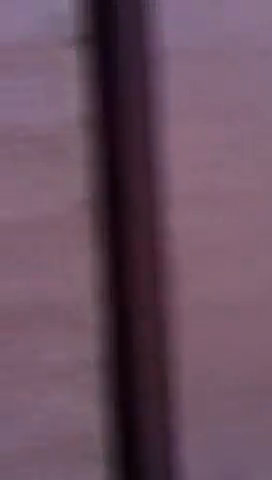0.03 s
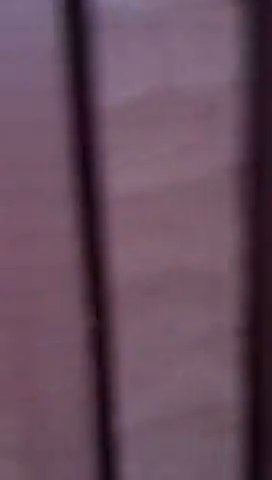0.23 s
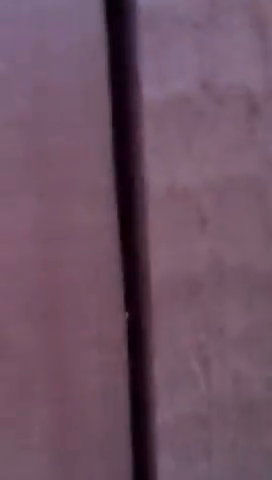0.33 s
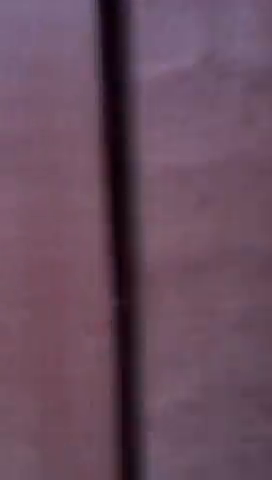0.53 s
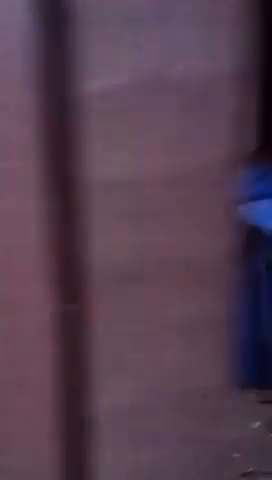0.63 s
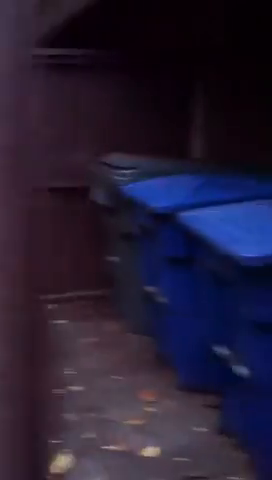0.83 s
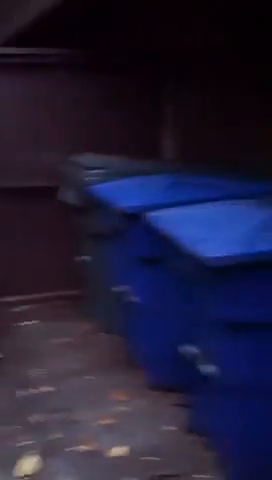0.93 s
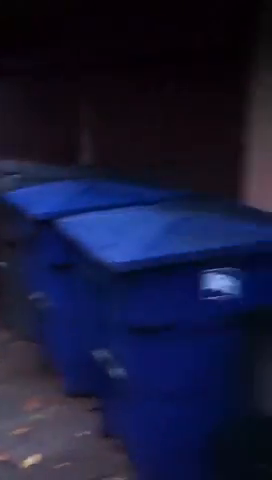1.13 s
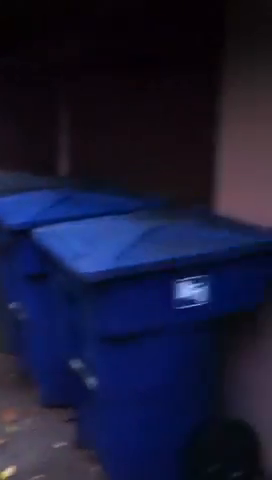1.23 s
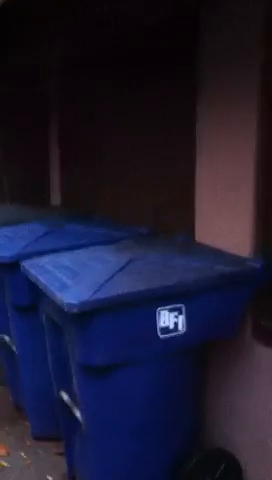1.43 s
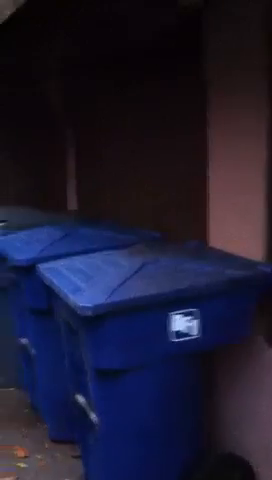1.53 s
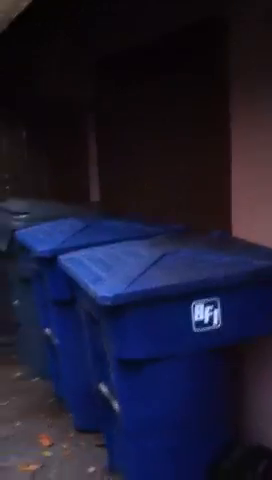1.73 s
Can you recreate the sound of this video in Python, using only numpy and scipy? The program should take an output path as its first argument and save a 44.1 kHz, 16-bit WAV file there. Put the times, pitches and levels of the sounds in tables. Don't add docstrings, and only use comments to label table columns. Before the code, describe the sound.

A gate's metal slide bolt is drawn close by: after near quiet, a gritty scrape with a piercing squeal bursts at 0.2-0.3 s and ends in a woody thud. Short creaks follow, strongest near 0.57 s, with faint ticks. It stays quiet until about 1.4 s, when leaves crackle; a latch plate knocks the post and rebounds at 1.5 s. Low traffic wash, faint hum and short yard echo remain behind.

```python
import sys
import numpy as np
from scipy import signal
from scipy.fft import rfft, irfft
from scipy.io import wavfile
from scipy.ndimage import uniform_filter1d

SR = 44100
rng = np.random.default_rng(int(sys.argv[2]) if len(sys.argv) > 2 else 0)


def gain_from_db(level_db):
    decades = np.asarray(level_db, float) / 20
    return 10 ** decades


def master_out(mix):
    frames = np.transpose(np.atleast_2d(mix))
    ceiling = np.clip(frames, -1, 1)
    pcm = np.round(ceiling * 32767).astype(np.int16)
    wavfile.write(sys.argv[1], SR, pcm)


N = 79380

# time_s, squeal_db (steel), scrape_db, wood_db (pressure on the boards)
BOLT_DRAW = [
    (0.142, -82, -73, -66.5),
    (0.176, -74, -62.5, -41.5),
    (0.199, -43.5, -47.5, -34),
    (0.227, -36, -34.5, -33.5),
    (0.2365, -15, -28, -36),
    (.27, -24.5, -23, -25),
    (0.298, -44, -24, -22.5),
    (0.306, -71, -60, -33.5),
    (0.341, -93, -64, -46),
]
# pitch_hz, width_hz, level_db
BOLT_MODES = [(7060, 200, -13), (8120, 270, -18.5), (9760, 120, -17.5), (10180, 100, -13.5),
              (10740, 170, -13.5), (11930, 100, -24), (14600, 120, -23.5)]
# freq_hz, level_db (per Hz)
SCRAPE_SPECTRUM = [(120, -31.5), (900, -18.5), (2200, -12.5), (5500, -21.5), (8000, -15.5), (11000, -26),
                   (13200, -28), (14000, -56.5)]
# pitch_hz, width_hz, level_db
STAPLE_MODES = [(1245.6, 44, -7), (1764, 35, -6), (2310, 120, -8), (2818, 110, -6), (3884, 92, -15.5),
                (4407, 100, -7.5), (4657, 110, -6.5), (5270, 120, -17.5), (6070, 130, -11),
                (6700, 150.7, -15)]
# pitch_hz, width_hz, level_db
BOARD_MODES = [(401.7, 150, -18), (583.7, 88, -5.5), (875, 130, -7), (1000, 140, -5.5), (1211, 200, -3),
               (1896, 180, -8), (2097, 100.3, -13.5), (2404, 210, -11.5), (3004, 99, -15), (4180, 300, -14),
               (4740, 150, -18)]
# pitch_hz, level_db, t60_s
BOLT_RING_MODES = [(7400, -46.5, 0.45), (10400, -56, .4)]
# peak_s, level_db, pitch_hz, rise_s, t60_s
GATE_CREAKS = [(.18, -33.5, 866, .024, 0.059), (.286, -12, 786.4, 0.01, 0.061),
               (.302, -13, 564, 0.013, 0.059), (.4, -44, 772, .015, 0.086),
               (.571, -20.5, 535.3, .011, 0.052), (.605, -41, 499, 0.00643, 0.092),
               (.699, -33, 554.7, 0.019, 0.078), (.724, -33, 577, .006, 0.046),
               (.745, -46.5, 550, .008, 0.081), (.85, -41, 599, 0.0098, 0.07),
               (.866, -43.5, 615, .006, 0.094), (1.116, -47.5, 582.6, 0.02, 0.2),
               (1.35, -54.5, 631, 0.0086, 0.14), (1.434, -40, 690, 0.0099, 0.088),
               (1.51, -34, 887, 0.024, 0.055), (1.697, -45, 694, 0.016, 0.034),
               (1.793, -34.5, 649, 0.013, .15), (1.795, -39, 787, 0.016, 0.061)]
# multiple, level_db
CREAK_OVERTONES = [(2.04, -7), (2.75, -17.5), (3.7, -30.5)]
# pitch_hz, level_db, t60_s
PLATE_MODES = [(4210, -15, .17), (5006, -20, .9), (5313, -18, .25), (5700, -3, .05), (5846, -14, .5),
               (6342, 0, .26), (6621, -1, .2), (7127, -6, .09), (8979, -27, .6), (10050, -6.5, .2),
               (11800, -23, .33), (12270, -16, .1), (13360, -12, .17), (14740, -8, .13)]
# pitch_hz, level_db, t60_s
POST_MODES = [(244.5, -15.5, 0.19), (332.4, -13, 0.15), (597.5, -0.5, 0.097), (689, 0.5, 0.06),
              (1070, -14, 0.034), (1270, -15, 0.064), (1805, -8.5, 0.064), (3053, -14, 0.038)]
# freq_hz, level_db (per Hz)
CRACK_SPECTRUM = [(120, -21), (350, 2), (1500, 2), (3300, -6), (10500, -19), (12000, -48)]
# delay_s (after the knock), level_db
KNOCK_REBOUNDS = [(.0055, -2), (.012, -4.5), (.026, -7)]
# peak_s, level_db, pitch_hz, rise_s, t60_s
SINGLE_PINGS = [(.018, -62, 6630, .014, .07), (.195, -35, 7140, .002, .04), (.244, -20, 2875, .009, .13),
                (.262, -21, 1765, .008, .05), (.27, -21, 2890, .015, .03), (.31, -40, 55, .02, .08),
                (.195, -46, 45, .02, .08), (.298, -33, 238, .02, .1), (.39, -52, 160, .03, .2),
                (.570, -36, 5300, .003, .02), (.575, -33, 942, .006, .09), (.572, -31, 1380, .005, .04),
                (.572, -40, 410, .008, .07), (.572, -40, 2060, .004, .04), (.574, -43, 1900, .005, .07),
                (.572, -40, 4120, .003, .025), (.51, -50, 1300, .008, .05), (.573, -29, 1485, .003, .04),
                (.574, -36, 5750, .002, .02), (1.192, -52, 3700, .003, .06), (1.283, -59, 2590, .008, .26),
                (.222, -33, 2300, .005, .03), (.235, -30, 2250, .006, .03), (.203, -35, 1200, .005, .04),
                (.283, -24, 2750, .003, .04), (.287, -24, 2000, .006, .06), (.293, -21, 1000, .008, .06),
                (1.409, -50, 4200, .002, .04), (1.455, -52, 3050, .004, .1), (1.424, -47, 480, .005, .04),
                (.7, -47, 950, .012, .12), (.36, -50, 380, .02, .2)]
# start_s, level_db, centre_hz, t60_s
LATCH_TICKS = [(0.445, -52, 3610, 0.023), (0.499, -51.5, 4640, 0.046), (.518, -53, 3040, 0.037),
               (.53, -49.5, 4250, 0.065), (.593, -47, 4470, 0.012), (.598, -53, 4500, 0.028),
               (0.611, -45.5, 4950, 0.034), (.633, -56.5, 4800, .03), (.821, -54.5, 2480, .03),
               (.93, -62, 4680, 0.021), (1.028, -63.5, 4500, 0.017), (1.348, -55, 894, 0.018),
               (1.406, -51.5, 2920, 0.059), (1.429, -49, 3200, 0.046), (.568, -42.5, 7940, 0.027)]
# start_s, level_db (rms), rise_s, t60_s, tilt_db (per octave)
LEAF_RUSTLES = [(.03, -54.5, 0.023, 0.53, -5), (0.192, -30.5, 0.0019, 0.09, 2.5), (.42, -51.5, 0.016, 1, 2),
                (.566, -32, 0.0092, 0.05, 2), (.612, -54, 0.0028, 0.13, 4.5),
                (0.664, -51.5, 0.0062, 0.29, 2.5), (.82, -52.5, 0.0028, 0.27, -4),
                (0.88, -67, .001, 0.048, 3), (1.101, -55, 0.0087, 0.08, -3.5),
                (1.186, -53, 0.0014, 0.24, 3), (1.25, -56, 0.017, 0.18, 1.5),
                (1.405, -48.5, 0.0043, 0.33, 3.5), (1.422, -42, 0.0031, 0.51, -0.5),
                (1.491, -42.5, 0.026, 0.28, -0.5), (1.529, -38.5, 0.0026, 0.21, -0.5),
                (1.674, -50.5, 0.0014, 0.19, 0.5), (1.715, -56.5, 0.012, 0.86, 2.5),
                (1.785, -42, 0.0039, 0.24, -2.5)]
# freq_hz, level_db (per Hz)
LEAF_SPECTRUM = [(70, -39), (170, -10), (708, -3.5), (1240, -10), (2400, -16), (10500, -32), (13000, -37.5),
                 (15400, -39.5)]
# freq_hz, t60_s
YARD_DECAY = [(200, .25), (1000, 0.57), (4000, 0.55), (12000, 0.5)]
# freq_hz, level_db (per Hz)
WASH_SPECTRUM = [(15, -84), (25, -27.5), (219, -8.5), (309, -14.5), (427, -14.5), (462, -16.5), (515, -20),
                 (3090, -34), (15000, -50.5)]
# time_s, level_db
HUM_LEVEL = [
    (0, -64),
    (.9, -66.5),
    (1.15, -60),
    (1.8, -57.5),
]
# freq_hz, level_db
MIC_RESPONSE = [(30, -23.5), (70, -7), (130, 2), (11000, -0.5), (13000, -11.5), (15500, -16)]

BOLT_STOP_S, KNOCK_S = 0.3, 1.518
SQUEAL_HZ, SQUEAL_WAVER = 7150, 0.12
OVERTONE_SLOPE = 0.43
KNOCK_DB, CRACK_DB, PLATE_DB = -26.5, -23.5, -42
WOOD_PER_S, WOOD_SPREAD_DB = 3000, 2.5
CRACKLE_PER_S, CRACKLE_SPREAD_DB = 14000, 2
PATCH_DB = 3.5
TICK_OCTAVES, TICK_SKIRT_DB = 0.36, -16.5
YARD_DB, SQUEAL_SEND_DB = -22, -7.5
WASH_DB, HUM_HZ = -58, 305.8


def bolt():
    s, *levels = np.transpose(BOLT_DRAW)
    t = np.arange(N) / SR
    squeal, scrape, wood = (gain_from_db(np.interp(t, s, db, -120, -120)) for db in levels)

    steel_grit = patchy(colour(grit(N, per_s=16000, spread_db=1.5), SCRAPE_SPECTRUM))
    staples = gain_from_db(-4.5) * body(STAPLE_MODES, WOOD_PER_S, WOOD_SPREAD_DB)
    boards = body(BOARD_MODES, WOOD_PER_S, WOOD_SPREAD_DB)
    rubbing = scrape * (steel_grit + staples) + wood * boards
    add(rubbing, BOLT_STOP_S, ring(BOLT_RING_MODES, waver=0.3))

    cycles = SQUEAL_HZ * np.cumsum(1 + 0.003 * drift(N, size=300)) / SR
    song = np.sqrt(2) * (1 + SQUEAL_WAVER * drift(N, size=150)) * np.sin(2 * np.pi * cycles)
    rough = body(BOLT_MODES, per_s=3000, spread_db=3.1)
    return squeal * (gain_from_db(-9) * rough + gain_from_db(-0.5) * song), rubbing


def creaks():
    out = np.zeros(N)
    for s, db, hz, rise, t60 in GATE_CREAKS:
        t, env = swell(rise, t60)
        wobble = 0.015 * drift(len(t), size=200)
        phase = 2 * np.pi * hz * np.cumsum(1 + wobble) / SR
        weaker_db = OVERTONE_SLOPE * min(db + 22.5, 0)
        overtones = sum(gain_from_db(o_db + weaker_db) * np.sin(k * phase) for k, o_db in CREAK_OVERTONES)
        add(out, s - rise, gain_from_db(db) * env * (np.sin(phase) + env ** 0.48 * overtones))
    return out


def knock():
    out = np.zeros(N)
    t, env = swell(rise=0.00074, t60=0.039)
    add(out, KNOCK_S + 0.004, gain_from_db(PLATE_DB) * ring(PLATE_MODES, waver=0.28))
    for delay, db in [(0, -0.56)] + KNOCK_REBOUNDS:
        add(out, KNOCK_S + delay, gain_from_db(KNOCK_DB + db) * ring(POST_MODES))
        crack = env * colour(grit(len(t), CRACKLE_PER_S, CRACKLE_SPREAD_DB), CRACK_SPECTRUM)
        add(out, KNOCK_S + delay, gain_from_db(CRACK_DB + 3.7 * db) * crack)
    return out


def pings():
    out = np.zeros(N)
    for s, db, hz, rise, t60 in SINGLE_PINGS:
        t, env = swell(rise, t60)
        add(out, s - rise, gain_from_db(db) * env * np.sin(2 * np.pi * hz * t))
    return out


def ticks():
    out = np.zeros(N)
    for s, db, hz, t60 in LATCH_TICKS:
        t, env = swell(0.00088, t60)
        band = [(hz / 8, 3 * TICK_SKIRT_DB),
                (hz / 2 ** TICK_OCTAVES, TICK_SKIRT_DB / 3),
                (hz, 0),
                (hz * 2 ** TICK_OCTAVES, TICK_SKIRT_DB / 2),
                (hz * 4, 2 * TICK_SKIRT_DB)]
        add(out, s, gain_from_db(db) * env * colour(grit(len(t), CRACKLE_PER_S, CRACKLE_SPREAD_DB), band))
    return out


def rustles():
    out = np.zeros(N)
    for s, db, rise, t60, tilt_db in LEAF_RUSTLES:
        t, env = swell(rise, t60)
        crackle = colour(grit(len(t), CRACKLE_PER_S, CRACKLE_SPREAD_DB), LEAF_SPECTRUM, tilt_db)
        add(out, s, gain_from_db(db) * env * patchy(crackle))
    return out


def yard(x):
    taps = np.zeros(SR // 2)
    at = np.arange(300, SR // 2 - 20, 20)
    taps[at + rng.integers(0, 20, len(at))] = rng.choice([-1., 1.], len(at))
    hz, t, z = signal.stft(taps, SR, nperseg=256)
    decay = gain_from_db(-60 * t / read(YARD_DECAY, hz)[:, None])
    tail = signal.istft(z * decay, SR, nperseg=256)[1]
    return signal.fftconvolve(x, tail / np.linalg.norm(tail))[:N]


def wash():
    frames, hz = N // 256 + 5, np.fft.rfftfreq(1024, 1 / SR)
    a, b, patches = rng.standard_normal((frames, 513, 3)).T
    patches = uniform_filter1d(uniform_filter1d(patches, size=12, axis=0), size=12, axis=1)
    z = (a + 1j * b) * gain_from_db(read(WASH_SPECTRUM, hz)[:, None] + 1.3 * evened(patches))
    air = evened(signal.istft(z, nperseg=1024, noverlap=768)[1][:N])

    s, db = np.transpose(HUM_LEVEL)
    t = np.arange(N) / SR
    steady = np.sqrt(2) * np.sin(2 * np.pi * HUM_HZ * t)
    wavering = 0.24 * evened(resonate(rng.standard_normal(N), HUM_HZ, 5.4))
    return gain_from_db(WASH_DB) * air + gain_from_db(np.interp(t, s, db)) * (steady + wavering)


def grit(count, per_s, spread_db):
    size = gain_from_db(spread_db * np.minimum(rng.exponential(1, count), 5)) * rng.standard_normal(count)
    return evened(size * (rng.random(count) < per_s / SR))


def body(modes, per_s, spread_db):
    out = 0
    for hz, width, db in modes:
        once = resonate(grit(N, per_s, spread_db), hz, width)
        out = out + gain_from_db(db) * evened(resonate(once, hz, width))
    return evened(out)


def ring(modes, waver=0):
    t = np.arange(16000) / SR
    out = np.zeros(len(t))
    for hz, db, t60 in modes:
        strength = gain_from_db(db - 60 * t / t60) * (1 + waver * drift(len(t), size=400))
        out += strength * np.sin(2 * np.pi * (hz * t + rng.random()))
    return np.minimum(t / 0.00099, 1) * out


def swell(rise, t60):
    t = np.arange(12000) / SR
    attack = np.sin(np.pi / 2 * np.clip(t / max(rise, 1e-4), 0, 1)) ** 2
    return t, attack * gain_from_db(-60 * np.maximum(t - rise, 0) / t60)


def patchy(x):
    z = signal.stft(x, nperseg=256, noverlap=192)[2]
    patches = uniform_filter1d(rng.standard_normal(z.shape), size=3, axis=0)
    patches = evened(uniform_filter1d(patches, size=6, axis=1))
    return evened(signal.istft(z * gain_from_db(PATCH_DB * patches), nperseg=256, noverlap=192)[1][:len(x)])


def resonate(x, hz, width):
    turn = np.exp(2j * np.pi * hz * np.arange(len(x)) / SR)
    r = np.exp(-np.pi * abs(width) / SR)
    return 2 * (turn * signal.lfilter([1 - r], [1, -r], x / turn)).real


def colour(x, points, tilt_db=0):
    hz = np.fft.rfftfreq(len(x), 1 / SR)
    gain_db = read(points, hz) + tilt_db * np.log2((hz + 50) / 2000)
    return evened(irfft(rfft(x) * gain_from_db(gain_db), len(x)))


def drift(count, size):
    return evened(uniform_filter1d(uniform_filter1d(rng.standard_normal(count), size=size), size=size))


def evened(x):
    return x / np.sqrt(np.mean(x ** 2) + 1e-20)


def read(points, hz):
    f, value = np.transpose(points)
    return np.interp(np.log(hz + 1), np.log(f + 1), value)


def add(mix, s, sound):
    at = round(s * SR)
    part = mix[max(at, 0):][:len(sound) + min(at, 0)]
    part += sound[max(-at, 0):][:len(part)]


def scene():
    squeal, scrape = bolt()
    tones = squeal + pings()
    near = scrape + creaks() + knock() + ticks() + rustles()
    echo = gain_from_db(YARD_DB) * yard(near + gain_from_db(SQUEAL_SEND_DB) * tones)
    return (near + tones + echo + wash())[None]


def band_limit(x):
    return signal.sosfilt(signal.butter(12, 15590, fs=SR, output="sos"), x)


def record(dry):
    hz = np.fft.rfftfreq(N, 1 / SR)
    heard = irfft(rfft(dry) * gain_from_db(read(MIC_RESPONSE, hz)), N)
    return band_limit(heard)


dry = scene()
out = record(dry)
master_out(out)
```